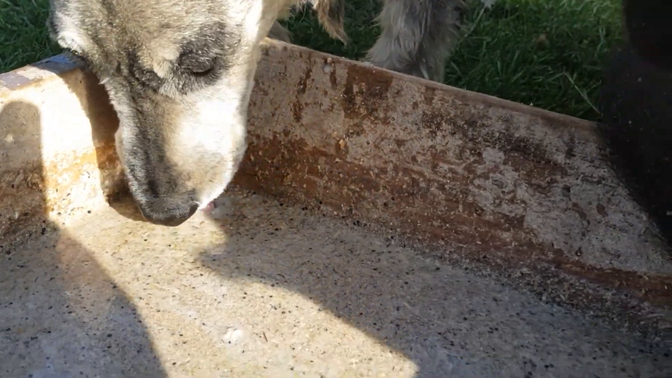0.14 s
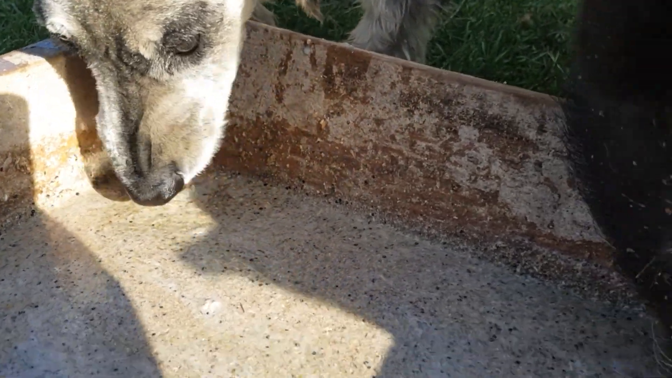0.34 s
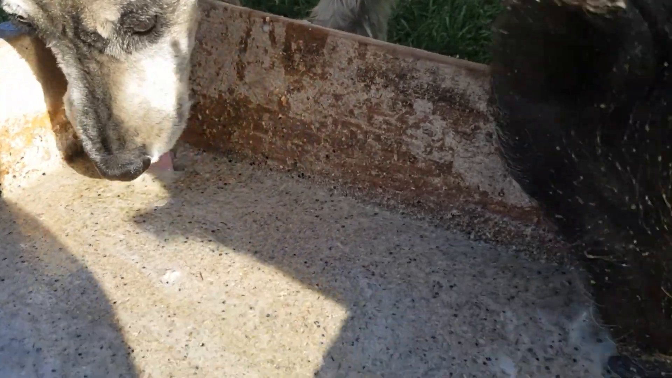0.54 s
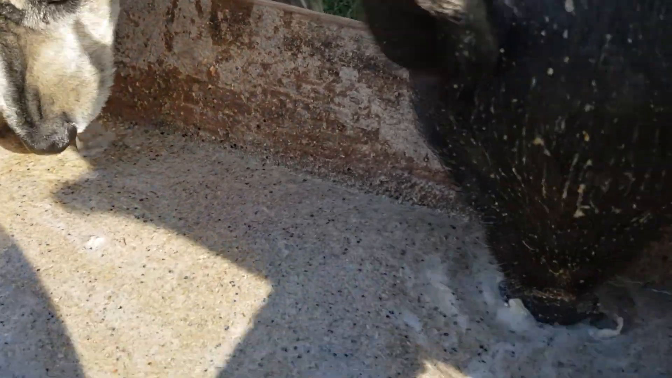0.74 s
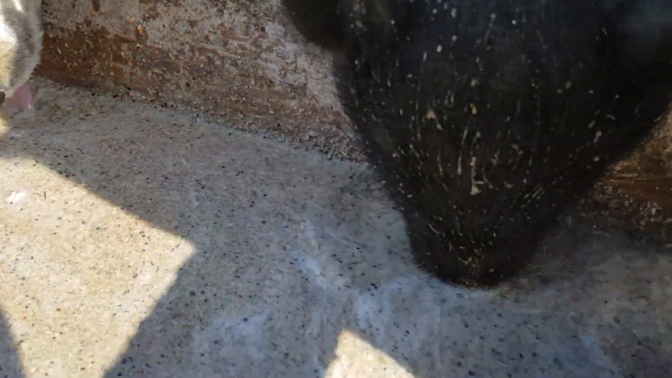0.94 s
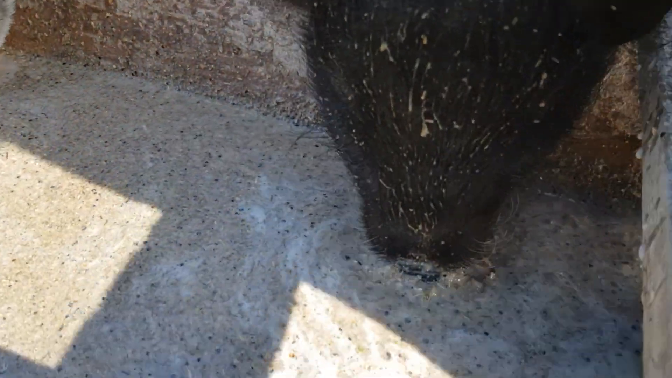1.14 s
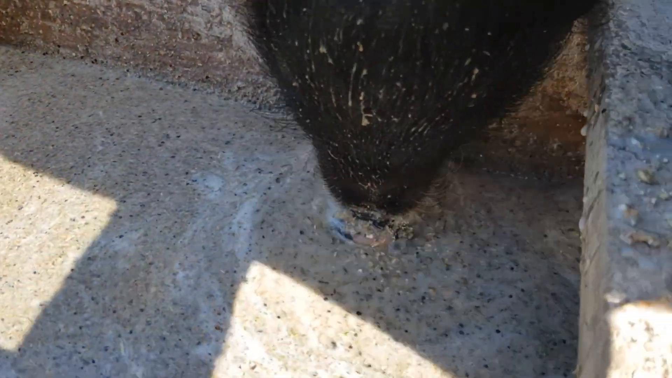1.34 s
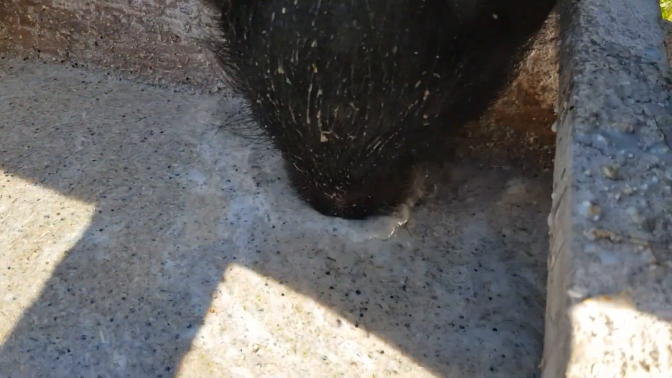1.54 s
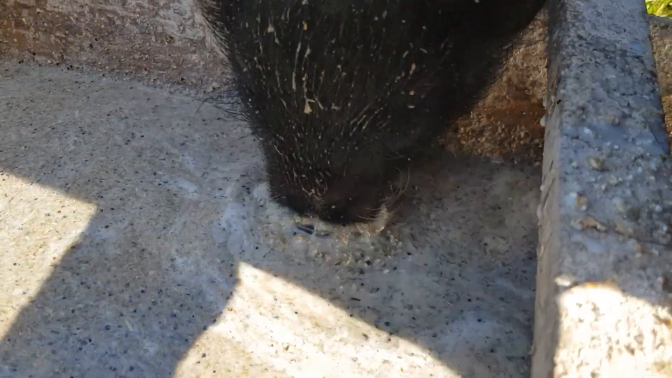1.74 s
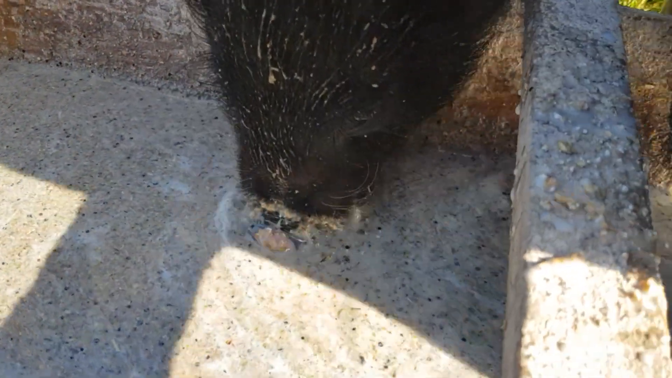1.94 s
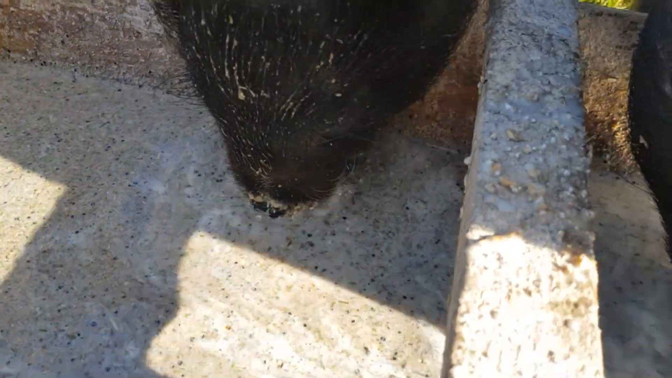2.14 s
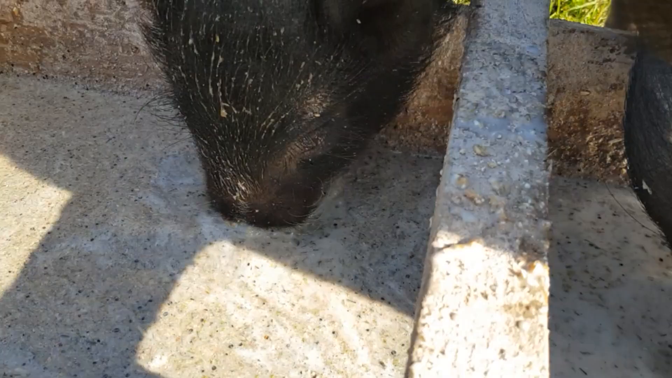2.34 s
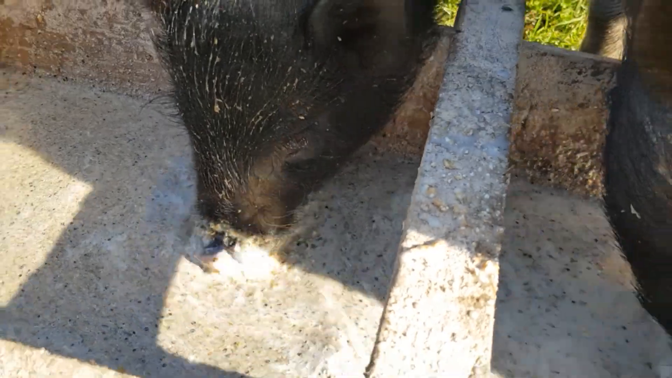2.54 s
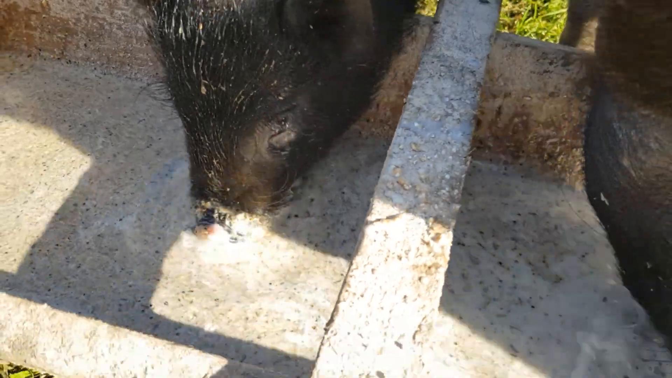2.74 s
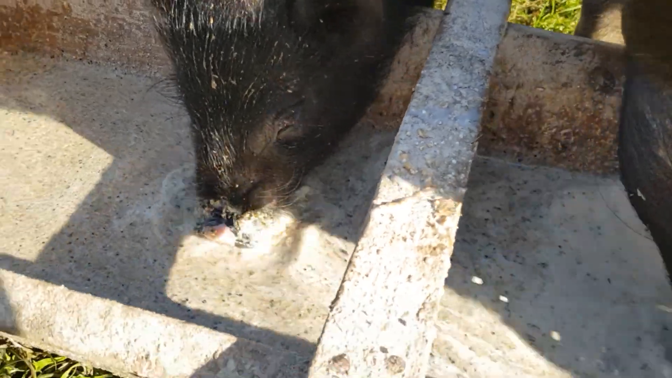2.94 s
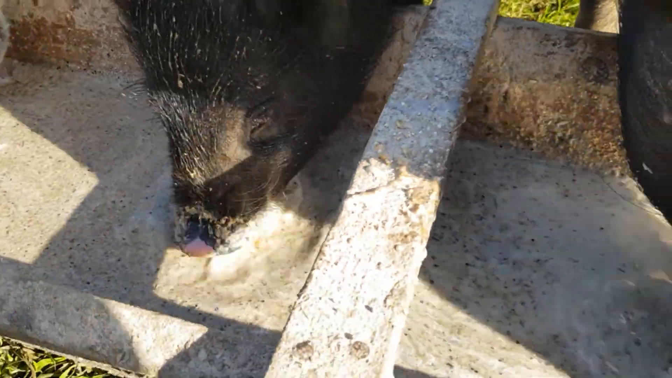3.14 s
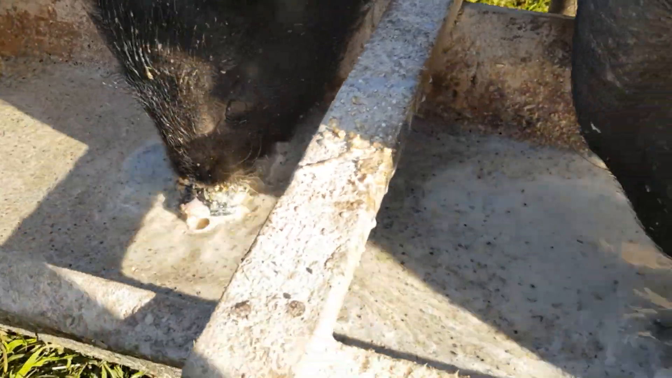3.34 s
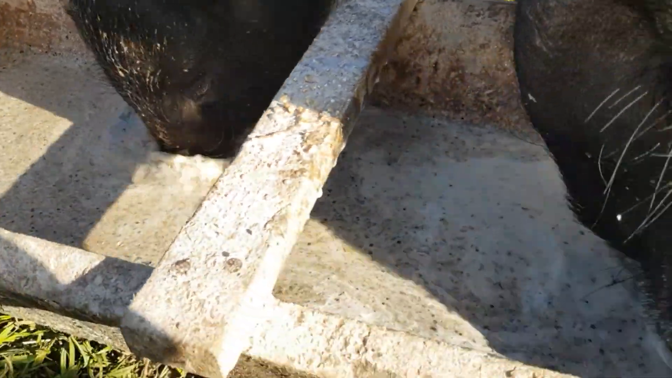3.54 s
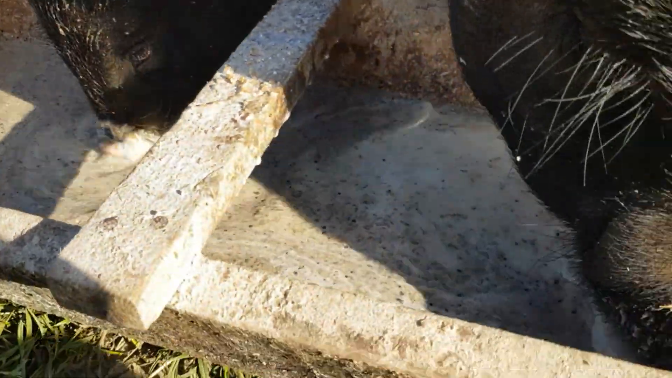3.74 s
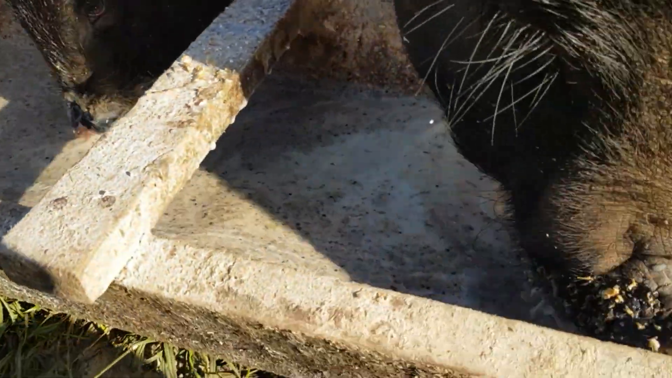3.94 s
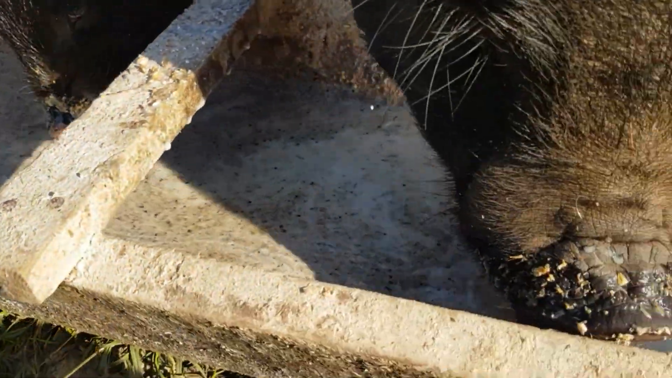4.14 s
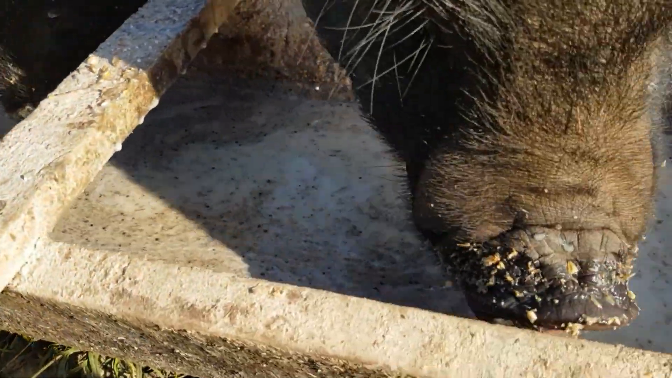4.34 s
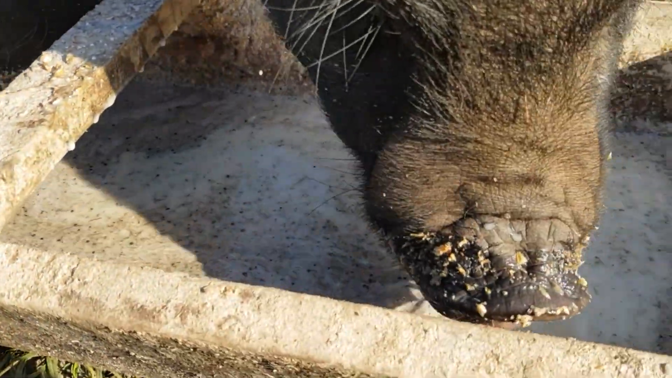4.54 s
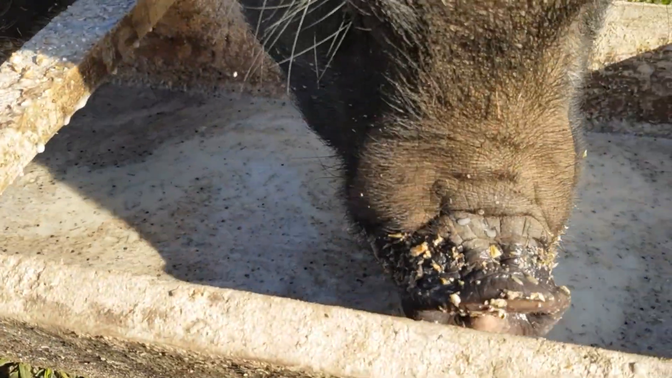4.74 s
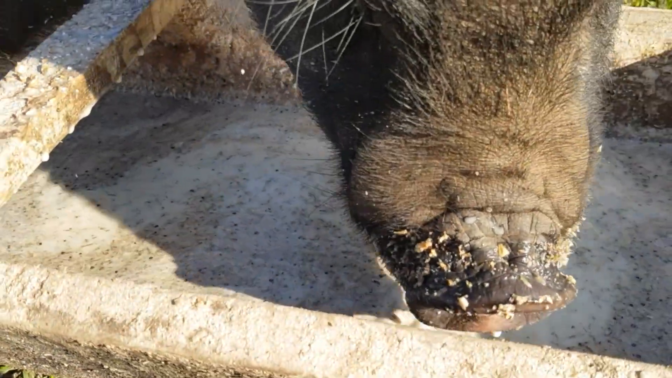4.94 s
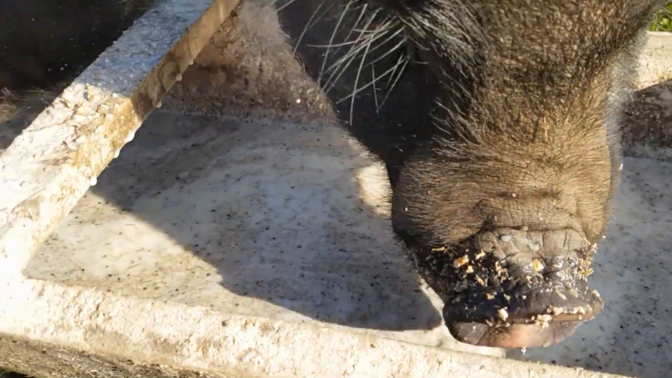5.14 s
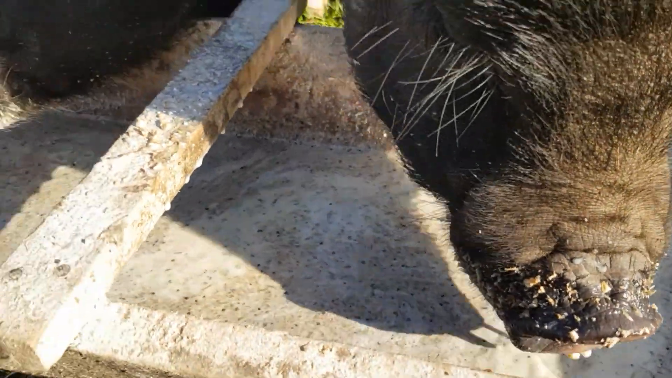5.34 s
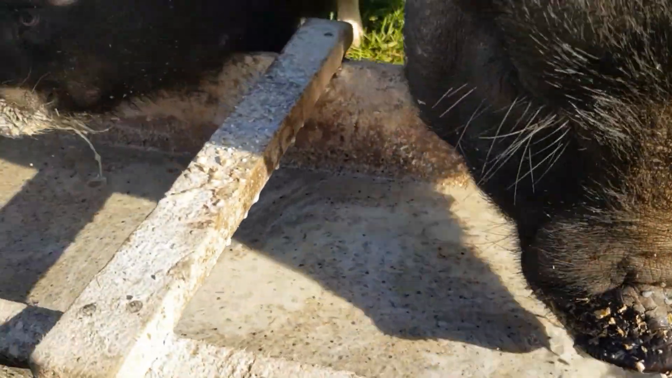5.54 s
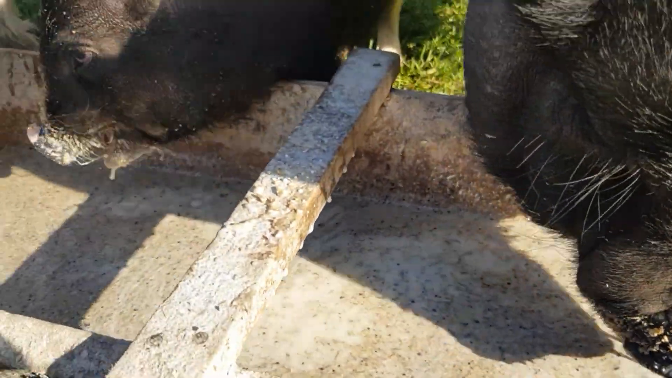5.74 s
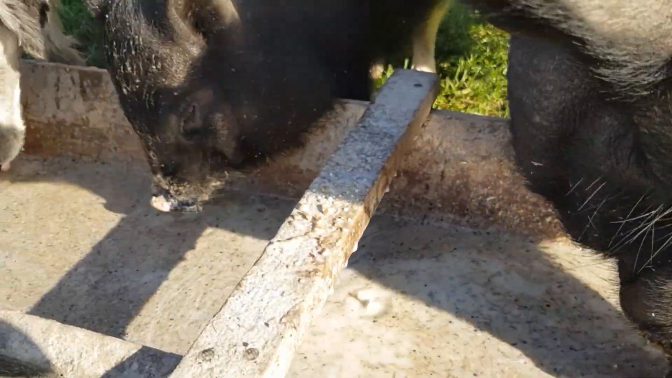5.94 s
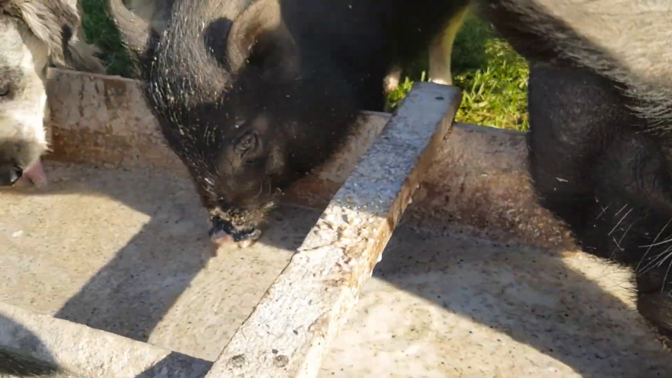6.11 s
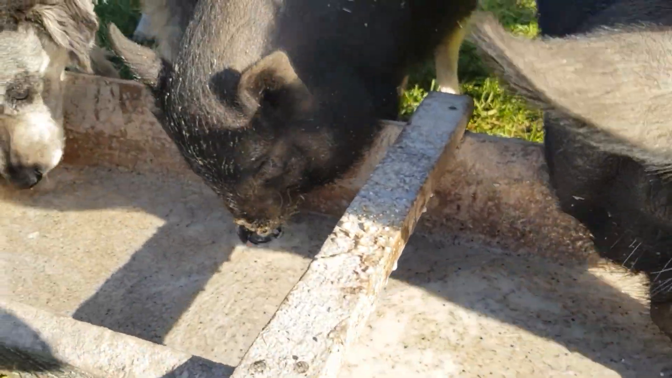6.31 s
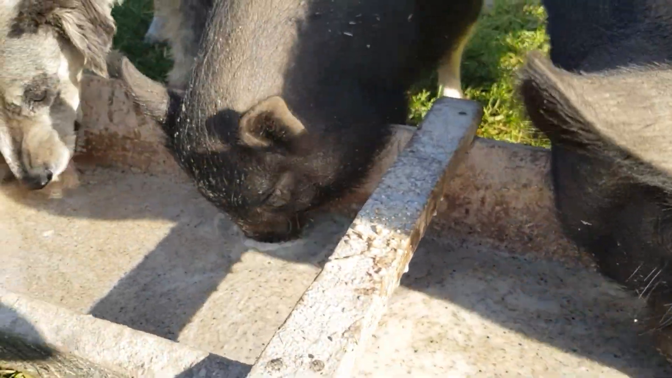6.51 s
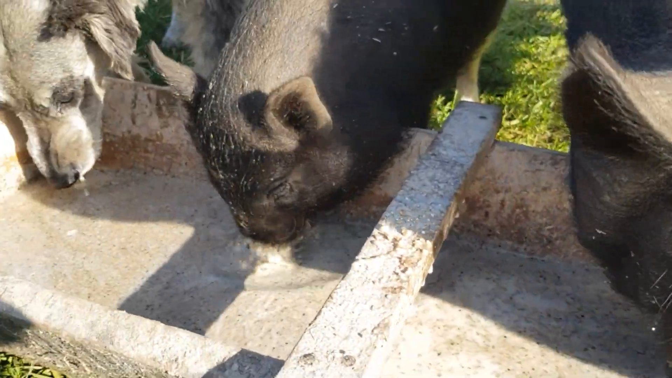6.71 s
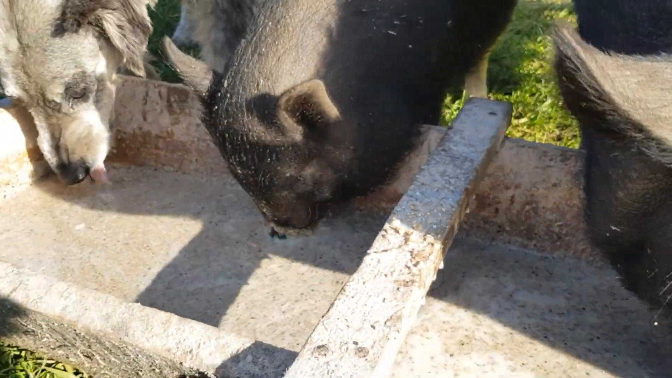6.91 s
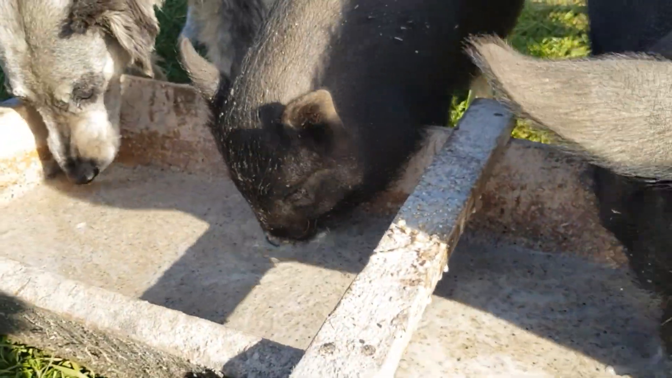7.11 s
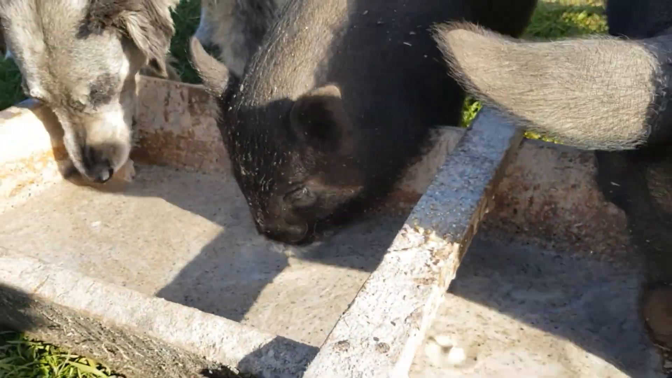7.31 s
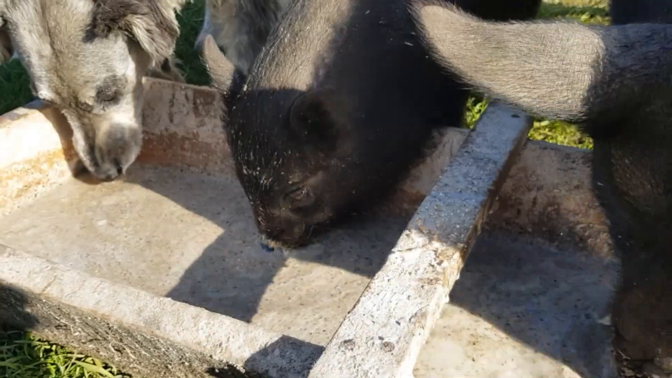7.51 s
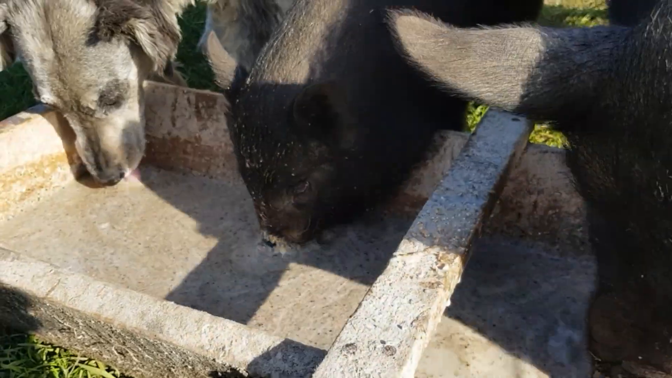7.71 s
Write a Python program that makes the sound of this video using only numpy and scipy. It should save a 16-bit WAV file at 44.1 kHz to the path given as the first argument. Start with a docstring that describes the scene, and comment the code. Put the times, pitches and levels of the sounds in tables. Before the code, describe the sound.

Close to the microphone and a little to the right, pigs and a dog slurp wet mash from a trough. One pig grunts low a few times near the start, and the squelching smacks grow loud and regular. Midway, wind buffets the microphone with a low rumble and a pig snorts softly. Gentler smacking and bubbly popping continue to the end over a faint outdoor hush.

```python
"""Pigs and a dog lap and smack wet feed from a wooden trough, close to a hand-held camera.
Air pockets in mouth and mash burst and ring for a few cycles as damped resonators, and spray fizzes.
One pig grunts low, its glottal pulses shaped by the throat; later comes a soft snort.
Turbulent wind buffets the two microphone ports over a steady open-air hush.
The mouths lie to the right, so their sound reaches the right port first."""
import sys
import numpy as np
from scipy import signal
from scipy.fft import rfft, irfft, next_fast_len
from scipy.io import wavfile
from scipy.ndimage import uniform_filter1d, map_coordinates

SR = 44100
rng = np.random.default_rng(int(sys.argv[2]) if len(sys.argv) > 2 else 0)


def master(y):
    """Save y as 16-bit WAV."""
    cut = np.clip(np.atleast_2d(y).T, -1, 1)
    pcm = np.round(cut * 32767)  # scale
    wavfile.write(sys.argv[1], SR, pcm.astype(np.int16))


N = 347067

# Spectra of the open air, eddies, wet mash and spray. Each row: frequency in Hz, relative density in dB.
HUSH_SPECTRUM = [(150, 17), (900, 37), (2000, -1), (5000, 5), (8500, 18.5), (16000, 18)]
EDDY_SPECTRUM = [(12, -53), (20, -51), (49, 7.5), (102, 4), (173, -7.5), (220, -21), (273, -19), (500, -18),
                 (650, -65), (1100, -120)]
MASH_SPECTRUM = [(90, -29), (200, -1.5), (550, -4), (950, 4), (1400, -1.5), (2100, -0.5), (3500, -11.5),
                 (6000, -12.5), (10000, -50)]
SPRAY_SPECTRUM = [(1500, -5), (3000, -6), (5000, -6.5), (6500, -9.5), (8700, -26), (10500, -16.5),
                  (15000, -17), (17000, -7)]
# The breeze on the ports. Each row: time in seconds, level in dB.
BREEZE_LEVELS = [(0.0, -43), (0.44, -48.5), (0.81, -41), (2.56, -41.5), (3.88, -43), (4.08, -26),
                 (4.76, -30.5), (5.02, -44.5), (5.37, -32.5), (5.85, -45.5), (6.99, -31), (7.12, -37),
                 (7.3, -43), (7.87, -41)]
# Gusts and air from snouts striking the ports. Each row: peak in seconds, level in dB, length in seconds.
AIR_PUFFS = [(0.088, -40, 0.05), (.5, -38, 0.044), (1.024, -36, 0.044), (1.26, -24.5, .04),
             (1.37, -35, 0.047), (1.517, -30, 0.033), (1.75, -28, 0.026), (1.803, -23, 0.023),
             (2.044, -28, 0.029), (2.122, -36, 0.045), (2.328, -36, 0.032), (2.63, -33, 0.055),
             (2.743, -38, .03), (3.187, -41, 0.048), (3.225, -37, .06), (3.32, -33, 0.027),
             (3.386, -33, 0.047), (3.625, -22.5, 0.054), (3.9, -30, 0.052), (3.99, -18, 0.075),
             (4.07, -19, 0.15), (4.141, -16, 0.033), (4.221, -3.5, 0.043), (4.273, -13.5, 0.021),
             (4.403, -23, 0.034), (4.522, -21, 0.016), (4.606, -41, 0.03), (4.808, -18, 0.094),
             (4.94, -41, 0.024), (4.993, -30.5, .04), (5.234, -32, .03), (5.535, -23.5, .04),
             (6.18, -33, 0.034), (6.315, -33, 0.021), (6.435, -33, 0.15), (6.57, -28, 0.024),
             (6.708, -23, 0.031), (6.827, -22.5, 0.027), (6.98, -28, 0.033), (7.037, -22, 0.027),
             (7.076, -18.5, 0.016), (7.126, -19.5, 0.038), (7.546, -37, 0.027), (7.71, -24, 0.088),
             (7.774, -33, 0.027)]
# One suck and smack each. Each row: jaw closure in seconds, gurgle in dB, spray in dB, build-up in seconds.
SMACKS = [(.085, -31.5, -61, 0.083), (.344, -32.5, -50, 0.35), (0.469, -32, -70, 0.35),
          (.545, -34, -70, 0.038), (.72, -41, -60, 0.045), (.88, -29, -46, 0.27), (1.007, -18, -23, 0.13),
          (1.253, -19, -37, 0.27), (1.36, -31.5, -46, 0.076), (1.511, -18, -24.5, 0.12),
          (1.779, -17.5, -24, 0.19), (1.89, -35, -34, 0.027), (2.036, -10.5, -18, 0.072),
          (2.22, -30, -33, .12), (2.327, -27.5, -22.5, 0.06), (2.42, -30, -38, 0.24),
          (2.618, -12, -26, 0.055), (2.76, -41, -34.5, 0.45), (2.923, -16, -23.5, 0.073),
          (3.091, -33.5, -30.5, 0.25), (3.241, -18, -26, 0.18), (3.3, -27, -33.5, 0.022),
          (3.425, -30.5, -32, 0.1), (3.621, -26, -27, 0.19), (3.733, -28.5, -26.5, 0.1),
          (3.789, -33, -47, 0.026), (3.959, -28.5, -52, 0.063), (4.09, -27, -30.5, 0.42),
          (4.23, -56, -39, 0.045), (4.403, -26.5, -37, 0.21), (4.545, -33.5, -34, 0.046),
          (4.616, -35, -28, 0.019), (4.798, -27.5, -29, 0.15), (5.034, -32, -64, 0.042),
          (5.137, -23, -37, 0.041), (5.205, -40, -50, 0.057), (5.408, -28.5, -39, 0.054),
          (5.488, -23, -25, 0.029), (5.783, -32, -28.5, 0.055), (5.902, -34.5, -35, 0.26),
          (6.141, -65, -38.5, 0.13), (6.238, -28, -26, 0.047), (6.315, -37, -64, 0.072),
          (6.479, -26, -62, 0.077), (6.672, -31.5, -42.5, 0.16), (7.0, -33.5, -37, 0.13),
          (7.138, -34.5, -31.5, 0.42), (7.469, -29.5, -32, .13), (7.712, -33, -32.5, .14),
          (7.819, -34, -35, 0.13)]
# The slop between mouthfuls. Each row: time in seconds, gurgle in dB, spray in dB.
SLOP_LEVELS = [(0.0, -47, -41), (0.99, -42.5, -40.5), (3.94, -46, -46), (4.12, -39, -41),
               (4.91, -47.5, -39.5), (5.83, -50, -49.5), (6.33, -43.5, -38.5), (7.67, -43, -45.5),
               (7.87, -45, -53)]
# The mouths' direction. Each row: time in seconds, left lag in samples, left minus right level in dB.
MOUTH_DIRECTIONS = [(0, 12.9, 0.5), (.7, 13.4, 0), (1.2, 17.6, 1), (2.2, 16.84, 1.5), (3.7, 20.6, 0.5),
                    (4.7, 10, 2), (5.7, 12.55, 3), (7.8, 11.05, 2)]
# The loudest air pockets bursting. Each row: peak in seconds, relative level in dB, pitch in Hz.
POCKET_BURSTS = [(.073, -28.5, 1060), (.086, -29, 1080), (.264, -21.5, 1140), (.346, -22.5, 404),
                 (.352, -20, 3550), (.434, -22, 4620), (.458, -31, 1280), (.654, -17.5, 5230),
                 (.708, -19.5, 776), (.735, -23.5, 1990), (.731, -13, 4620), (.734, -17.5, 754),
                 (.916, -22, 860), (.928, -20, 757), (.974, -21, 1520), (1.01, -10.5, 1630),
                 (1.009, -13, 580), (1.048, -15, 4520), (1.046, -14.5, 1900), (1.146, -11, 3220),
                 (1.193, -13.5, 995), (1.213, -9, 1346), (1.241, -11.5, 1560), (1.259, -12, 621),
                 (1.267, -19, 1480), (1.344, -23.5, 1770), (1.432, -21.5, 970), (1.481, -18, 405),
                 (1.491, -22, 1100), (1.519, -17.5, 252), (1.519, -14.5, 660), (1.522, -13.5, 2380),
                 (1.554, -18.5, 966), (1.677, -14, 3180), (1.74, -16.5, 505), (1.741, -12, 2100),
                 (1.762, -14, 1060), (1.781, -7, 1580), (1.797, -12, 3260), (1.878, -20, 1000),
                 (2.025, -20, 980), (2.039, -1, 1886), (2.051, -20.5, 407), (2.16, -18, 1974),
                 (2.206, -26, 424), (2.312, -16, 535), (2.33, -6, 3550), (2.427, -18, 4010),
                 (2.492, -25.5, 740), (2.568, -22.5, 1790), (2.583, -18.5, 790), (2.607, -6.5, 1210),
                 (2.626, -13, 476), (2.627, -11.5, 4540), (2.764, -19, 5630), (2.821, -16.5, 2740),
                 (2.831, -16, 1680), (2.916, -14, 2400), (2.925, -8.5, 3985), (2.929, -22.5, 408),
                 (3.18, -6, 3200), (3.18, -12.5, 833), (3.18, -11.5, 337), (3.196, -11.5, 2940),
                 (3.223, -17, 2080), (3.243, -12, 1900), (3.302, -17.5, 787), (3.377, -17.5, 4800),
                 (3.423, -16.5, 1480), (3.627, -3, 820), (3.629, -18.5, 291), (3.668, -4.5, 1944),
                 (3.684, -22, 1780), (3.711, -17.5, 1620), (3.962, -23, 990), (4.006, -15, 844),
                 (4.026, -18, 872), (4.05, -23, 1850), (4.213, -25, 254), (4.233, -22, 285),
                 (4.324, -22.5, 1250), (4.349, -23, 930), (4.401, -29, 1710), (4.456, -26, 203),
                 (4.601, -25, 770), (4.766, -23, 1010), (4.824, -17.5, 832), (5.017, -26.5, 1680),
                 (5.018, -27, 720), (5.128, -23.5, 3570), (5.139, -18, 1170), (5.2, -18.5, 1750),
                 (5.207, -23.5, 806), (5.408, -25.5, 5050), (5.485, -22, 1345), (5.779, -19.5, 1023),
                 (5.866, -19, 1596), (5.914, -23, 1380), (5.917, -26, 433), (6.035, -33.5, 825),
                 (6.095, -25, 2900), (6.232, -24.5, 3010), (6.245, -16, 1400), (6.313, -23, 980),
                 (6.447, -25, 1000), (6.481, -21, 990), (6.61, -21.5, 1260), (6.663, -34, 1490),
                 (6.742, -22, 1970), (7.008, -16.5, 1523), (7.112, -19, 5250), (7.152, -23, 900),
                 (7.152, -24, 500), (7.224, -30, 924), (7.346, -16, 920), (7.395, -22, 1460),
                 (7.403, -19.5, 3960), (7.458, -37, 910), (7.459, -21.5, 2060), (7.476, -18, 5950),
                 (7.478, -23.5, 620), (7.502, -22, 1005), (7.64, -27, 944), (7.725, -20.5, 1980),
                 (7.759, -19, 2020), (7.815, -20.5, 920), (7.863, -26, 1200)]
# Spray thrown from the lips. Each row: peak in seconds, relative level in dB, nominal length in ms.
LIP_SPLASHES = [(0.08, -28, 9.8), (0.337, -28, 9.4), (0.349, -23, 11.6), (0.657, -37, 2.8), (0.735, -20, 7),
                (0.889, -18, 5), (0.981, -25, 4.5), (1.012, -28, 12), (1.146, -18.5, 11), (1.204, -28, 4.3),
                (1.258, -19, 10), (1.501, -19, 7), (1.519, -20.5, 10), (1.717, -34, 3.6), (1.746, -30, 6),
                (1.781, -12, 14), (1.795, -10.5, 9), (2.04, -12.5, 9.1), (2.046, -11, 6), (2.327, -5, 3.7),
                (2.607, -16.5, 5), (2.626, -4.5, 4.7), (2.764, -25, 2.9), (2.916, -21.5, 11),
                (2.925, -13, 4), (3.154, -23, 7.8), (3.178, -9.5, 9.2), (3.43, -15.5, 8.9),
                (3.628, -14, 4.8), (3.667, -16.5, 2.7), (3.938, -29, 6), (4.027, -27, 15),
                (4.395, -25.5, 13.4), (4.486, -30.5, 3.6), (4.609, -30, 10), (5.2, -31.5, 16),
                (5.439, -29, 5.9), (5.48, -28, 9.3), (5.78, -31, 17), (6.224, -25.5, 17), (6.475, -29.5, 4),
                (7.113, -21, 5.1), (7.152, -23, 4), (7.476, -19, 4.3), (7.745, -29.5, 4)]
# A pig's grunts. Each row: start in seconds, length in seconds, middle pitch in Hz, relative level in dB.
PIG_GRUNTS = [(0.615, .2, 80, -25.5), (0.823, .1, 112.9, -29.5), (1.034, .13, 93.86, -25.5)]
# Resonances of its throat. Each row: centre in Hz, bandwidth in Hz, relative gain in dB.
FORMANTS = [(90, 39, -2.5), (238, 130, -20), (670, 110, -61)]
# Diffraction round the camera. Each row: frequency in Hz, left lead in radians, left minus right in dB.
PORT_DIFFERENCES = [(150, 0.16, .5), (674, 0.49, -2), (1210, 0.037, -1.5), (5630, 0, 1),
                    (8060, 0.0099, -4.5)]


def amp(db):
    """Amplitude ratio of a level in decibels."""
    return 10 ** (np.asarray(db) / 20)


def unit(x):
    """The signal scaled to an RMS of one."""
    return x / np.sqrt(np.mean(x ** 2) + 1e-20)


def curves(rows, times=None):
    """Each column after the first, interpolated at the given times or else at every sample."""
    knots, *columns = np.transpose(rows)
    return [np.interp(np.arange(N) / SR if times is None else times, knots, c) for c in columns]


def wobble(rate):
    """Smooth random modulation with `rate` knots a second."""
    knots = rng.standard_normal(int(N * rate / SR) + 4)
    return map_coordinates(knots, [np.arange(N) * rate / SR])


def filtered(x, response):
    """Linear filtering: the spectrum is multiplied by a frequency response."""
    size = next_fast_len(N + 8192)
    return irfft(rfft(x, size) * response(np.fft.rfftfreq(size, 1 / SR)), size)[..., :N]


def colour(points):
    """Frequency response through (Hz, dB) points on a logarithmic axis."""
    knots_hz, db = np.transpose(points)
    return lambda hz: amp(np.interp(np.log(hz + 1), np.log(knots_hz), db, left=-90))


def at_ports(starts, sounds, scatter):
    """Time and level differences place each sound at its own spot; lags spread by `scatter` samples."""
    lag, pan_db = curves(MOUTH_DIRECTIONS, starts)
    spot = rng.standard_normal((len(starts), 2))
    lag, pan_db = lag + scatter * spot[:, 0], pan_db + 2.5 * spot[:, 1]
    ports = []
    for side in (1, -1):
        arrival = np.round(starts * SR + side * lag / 2).astype(int).clip(0)
        index = arrival[:, None] + np.arange(sounds.shape[1])
        panned = sounds * amp(side * pan_db / 2)[:, None]
        ports.append(np.bincount(index.ravel(), panned.ravel(), N)[:N])
    return np.array(ports)


def hush():
    """The open air is stationary noise, uncorrelated between the ports."""
    return amp(-50) * unit(filtered(rng.standard_normal((2, N)), colour(HUSH_SPECTRUM)))


def wind():
    """Turbulent pressure, partly coherent between the ports: puffs stand out of a lumpy breeze."""
    t = np.arange(0, N / SR, .002)
    breeze_db, = curves(BREEZE_LEVELS, t)
    puffs = sum(amp(db) * np.exp(-4 * ((t - peak_s) / length_s) ** 2) for peak_s, db, length_s in AIR_PUFFS)
    strength = np.interp(np.arange(N) / SR, t, amp(breeze_db) + puffs)
    noise = rng.standard_normal((3, N))
    eddies = filtered(noise[:2] + 0.58 * noise[2], colour(EDDY_SPECTRUM))
    levelled = eddies / np.sqrt(np.abs(uniform_filter1d(eddies ** 2, size=1500)))
    lumps = amp(2 * np.array([wobble(28), wobble(28)]))
    return strength * unit(lumps * levelled) * amp([[1.4], [-1.4]])


def mouthfuls():
    """Envelopes of gurgle and spray: exponential growth, then rapid decay as the jaws close."""
    build_db, ebb_db_per_s = 34, 510
    closure_s, gurgle_db, spray_db, build_s = np.transpose(SMACKS)
    t = np.arange(0, N / SR, .002)
    after_s = t - closure_s[:, None]
    shape_db = np.where(after_s < 0, build_db * after_s / build_s[:, None], -ebb_db_per_s * after_s)
    return [np.interp(np.arange(N) / SR, t, amp(slop_db) + amp(db[:, None] + shape_db).sum(axis=0))
            for db, slop_db in zip((gurgle_db, spray_db), curves(SLOP_LEVELS, t))]


def swell(age):
    """A gamma envelope rises to 1 at age 1, then fades a little more slowly."""
    return (age * np.exp(1 - age)) ** 3


def bubbles(hz, rise_s, size, climb, rough):
    """Bubble resonance: the pitch climbs as an air pocket shrinks and wavers with its walls."""
    age = np.arange(size) / SR / rise_s[:, None]
    waver = rough * np.cumsum(rng.standard_normal((len(hz), size)), axis=1) * np.sqrt(hz[:, None] / SR)
    phase = 2 * np.pi * hz[:, None] * rise_s[:, None] * age * (1 + climb * (age / 2 - 1))
    return np.sin(phase + waver) * swell(age)


def swarm(count, hz, spread, cycles, rough, size):
    """Superposed bubbles at random moments, log-normal in pitch, each peaking after `cycles` periods."""
    draw = np.clip(rng.standard_normal((count, 2)), -1.7, 1.7)
    pitch = np.minimum(hz * np.exp(spread * draw[:, 0]), 16000)
    rings = bubbles(pitch, cycles / pitch, size, climb=0.023, rough=rough) * amp(5.84 * draw[:, 1:])
    return unit(at_ports(rng.random(count) * N / SR, rings, scatter=4.7))


def slurp():
    """Bubble clouds and noise, modulated by each mouthful: mash gurgles and the lips squelch in surges."""
    gurgle_envelope, spray_envelope = mouthfuls()
    noise = rng.standard_normal((2, 2, N))
    pockets = swarm(count=1900, hz=1301, spread=0.5285, cycles=3.15, rough=0.98, size=600)
    squelch = swarm(count=1300, hz=2700, spread=.45, cycles=11, rough=.7, size=700)
    hiss = unit(filtered(noise[1], colour(SPRAY_SPECTRUM))) * amp(2 * wobble(60))
    crackle = swarm(count=500, hz=3950, spread=0.48, cycles=2.95, rough=0.55, size=250)
    gulps = swarm(count=800, hz=338, spread=0.35, cycles=0.82, rough=0.37, size=1000)
    gurgle = unit(filtered(pockets + .9 * noise[0], colour(MASH_SPECTRUM))) + amp(-10) * gulps
    spray = unit(unit(hiss + 1.1 * squelch) + amp(-8) * crackle)
    surge = wobble(35)
    return gurgle_envelope * amp(2.2 * surge) * gurgle + spray_envelope * amp(3 * surge) * spray


def pops():
    """Damped resonance: large, low pockets ring longer, while the mash slaps with broadband noise."""
    peak_s, db, hz = np.transpose(POCKET_BURSTS)
    rise_s, size = .0035 * (1000 / hz) ** .45, 1400
    gain = amp(db)[:, None]
    rings = bubbles(hz, rise_s, size, climb=.03, rough=.45)
    bursts = rng.standard_normal(rings.shape) * swell(np.arange(size) / SR / (1.72 * rise_s[:, None]))
    slaps = filtered(at_ports(peak_s - 1.3 * rise_s, bursts * gain, scatter=2.2), colour(MASH_SPECTRUM))
    return amp(4.5) * at_ports(peak_s - rise_s, rings * gain, scatter=1.7) + amp(-0.5) * slaps


def trough(x):
    """Diffuse reflection from the boards and the wet surface adds a short exponential tail."""
    reverberation_s, first_echo_s = 0.05, .0015
    t = np.arange(SR // 10) / SR
    tail = rng.standard_normal((2, len(t))) * amp(-60 * t / reverberation_s) * (t > first_echo_s)
    return signal.fftconvolve(x, tail / np.linalg.norm(tail[0]), axes=1)[:, :N]


def splashes():
    """Droplets add incoherently into ragged noise bursts that grow and decay equally fast."""
    peak_s, db, length_ms = np.transpose(LIP_SPLASHES)
    decay_s, size = length_ms[:, None] / 1000 * 0.4195, 2600
    noise = rng.standard_normal((len(peak_s), 2, size))
    ragged = amp(7.6 * unit(uniform_filter1d(noise[:, 1], size=40)))
    from_peak_s = (np.arange(size) - size // 2) / SR
    drops = noise[:, 0] * ragged * np.exp(-np.abs(from_peak_s / decay_s)) * amp(db)[:, None]
    placed = at_ports(peak_s - size // 2 / SR, drops, scatter=3.6)
    return amp(8.5) * filtered(placed, colour(SPRAY_SPECTRUM))


def throat(hz):
    """The vocal tract acts as parallel resonators of alternating sign."""
    return sum((-1) ** k * amp(db) * 1j * hz * width / (centre ** 2 - hz ** 2 + 1j * hz * width)
               for k, (centre, width, db) in enumerate(FORMANTS))


def grunts():
    """Source and filter: uneven glottal pulses of sagging pitch and breath noise excite the throat."""
    attack_s, release_s, sag_hz_per_s = 0.034, 0.065, 30
    voice = np.zeros(N)
    for start_s, length_s, hz, db in PIG_GRUNTS:
        t = np.arange(N) / SR - start_s
        effort = np.clip(np.minimum(t / attack_s, (length_s - t) / release_s), 0, 1)
        pitch = hz - sag_hz_per_s * np.clip(t - length_s / 2, -length_s, length_s)
        jitter, shimmer_db = .08 * wobble(70), 2.5 * wobble(80)
        cycle = np.floor(np.cumsum(pitch * (1 + jitter)) / SR)
        pulses = np.diff(cycle, prepend=0) * amp(shimmer_db)
        breath = 0.054 * rng.standard_normal(N)
        voice += (pulses + breath) * amp(db) * effort
    return amp(52) * filtered(voice, throat) * amp([[1.2], [-1.2]])


def snort():
    """Turbulent flow through wet nostrils gives one soft swell of bright hiss."""
    peak_s, length_s = 4.085, .07
    envelope = np.exp(-4 * ((np.arange(N) / SR - peak_s) / length_s) ** 2)
    hiss = filtered(rng.standard_normal((2, N)), lambda hz: colour(SPRAY_SPECTRUM)(hz) * np.sqrt(hz))
    return amp(-35) * envelope * unit(hiss)


def scene():
    """Superposition of all the sources; the pops and grunts also reflect from the trough."""
    direct = pops() + grunts()
    return direct + amp(-10) * trough(direct) + splashes() + slurp() + snort() + wind() + hush()


def record(dry):
    """Diffraction parts the ports in phase and level; peaks saturate, and the band ends at 16 kHz."""
    hz, lead, pan_db = np.transpose(PORT_DIFFERENCES)
    half = np.array([[.5], [-.5]])

    def diffraction(f):
        return np.exp(1j * half * np.interp(f, hz, lead)) * amp(half * np.interp(f, hz, pan_db))

    ports = filtered(dry, diffraction)
    clipped = ports / (1 + np.abs(ports) ** 6) ** (1 / 6)
    return filtered(clipped, lambda f: f < 16000)


dry = scene()
out = record(dry)
master(out)
```